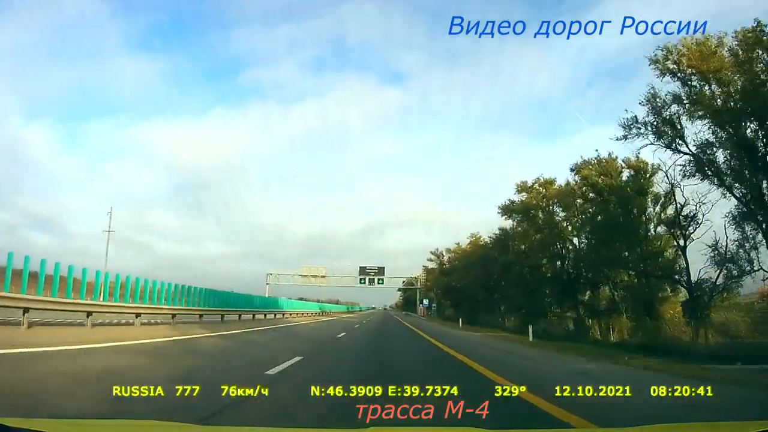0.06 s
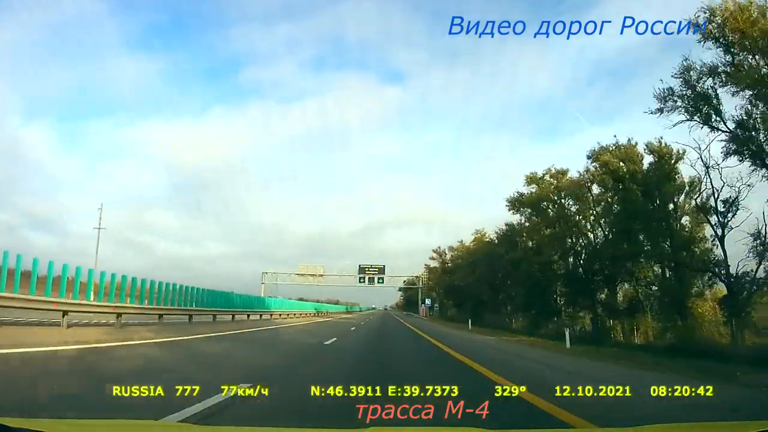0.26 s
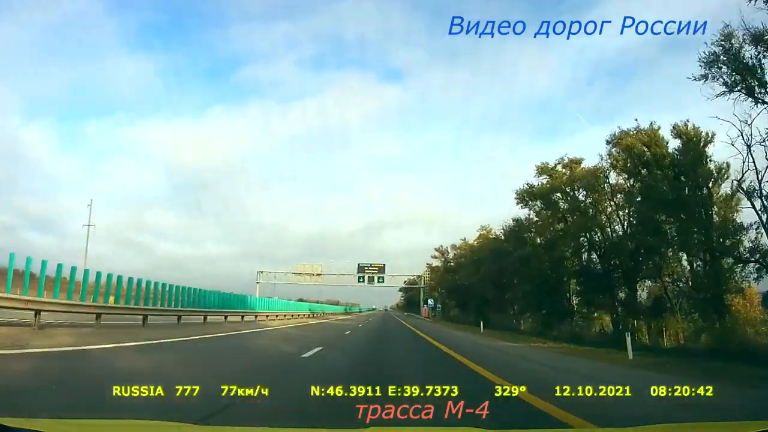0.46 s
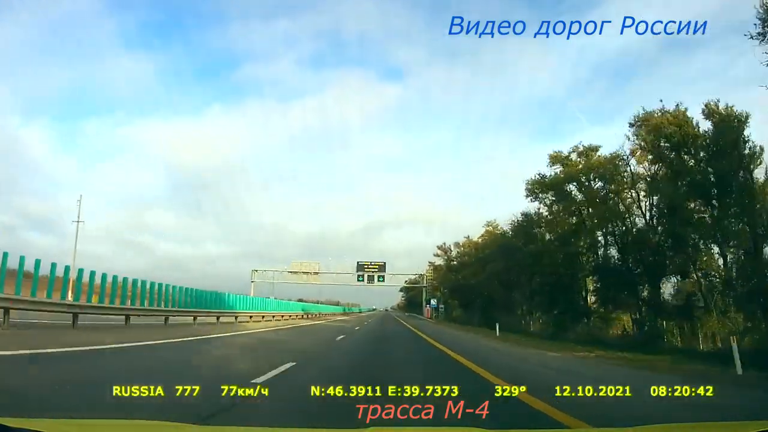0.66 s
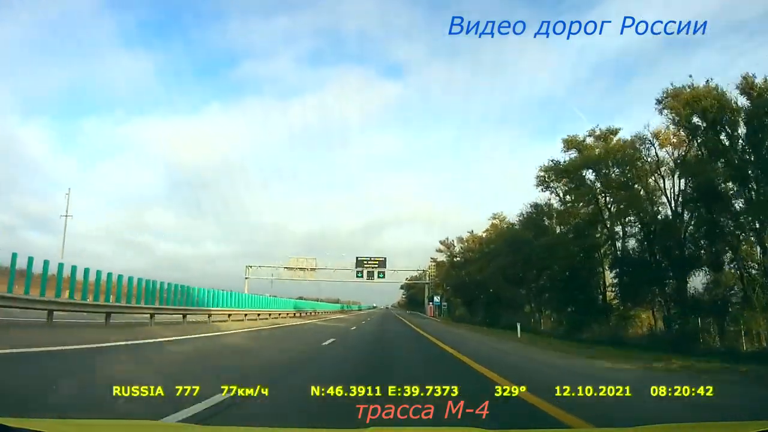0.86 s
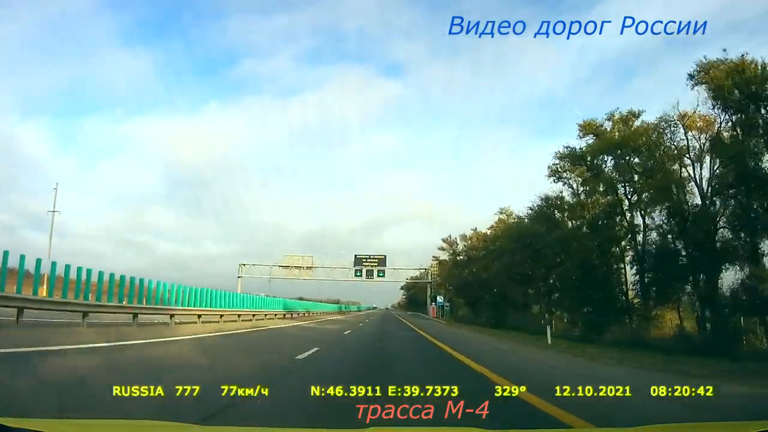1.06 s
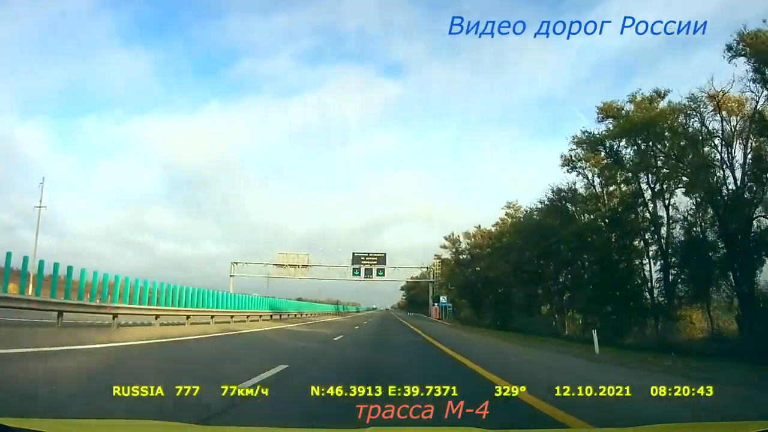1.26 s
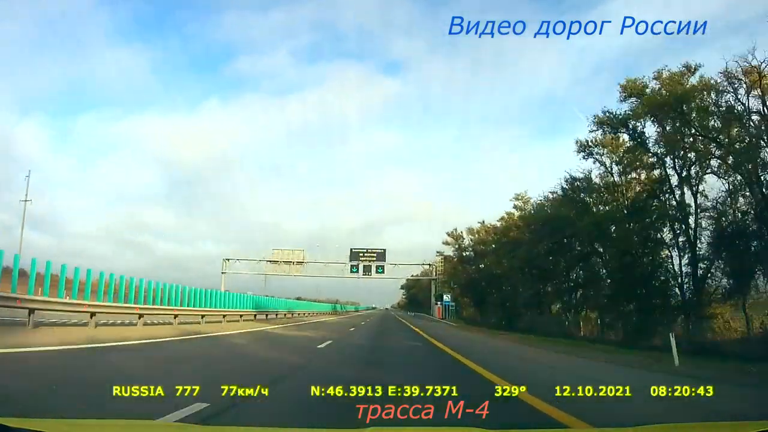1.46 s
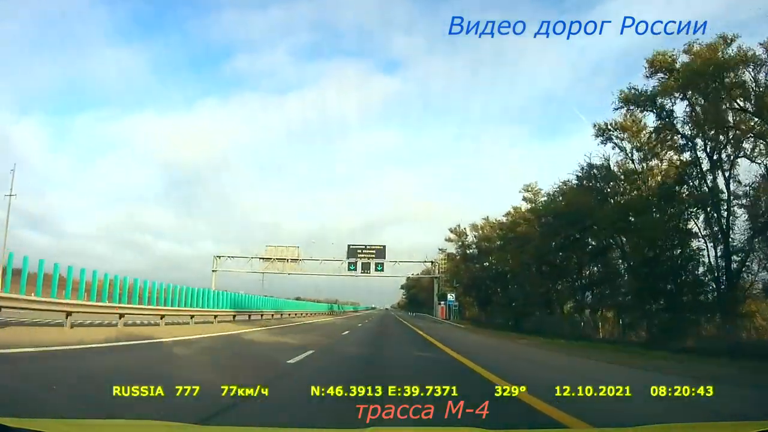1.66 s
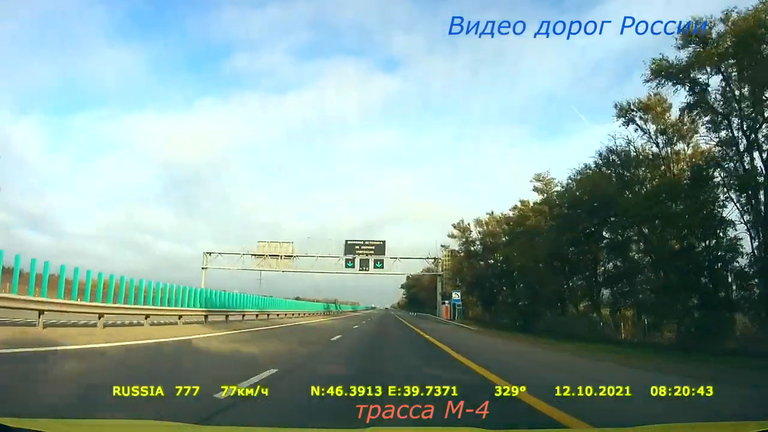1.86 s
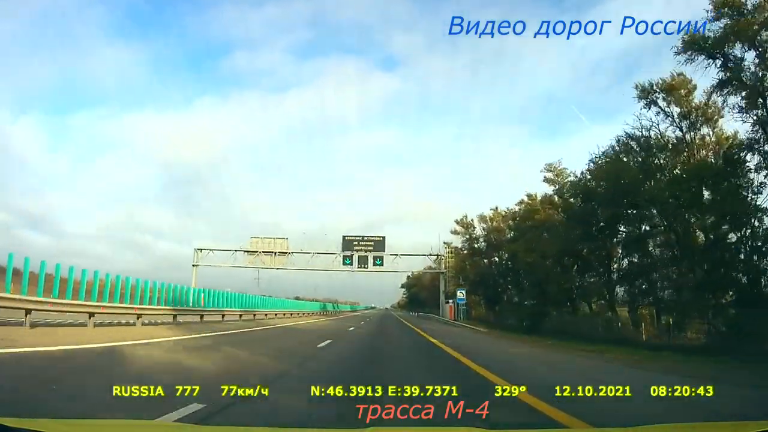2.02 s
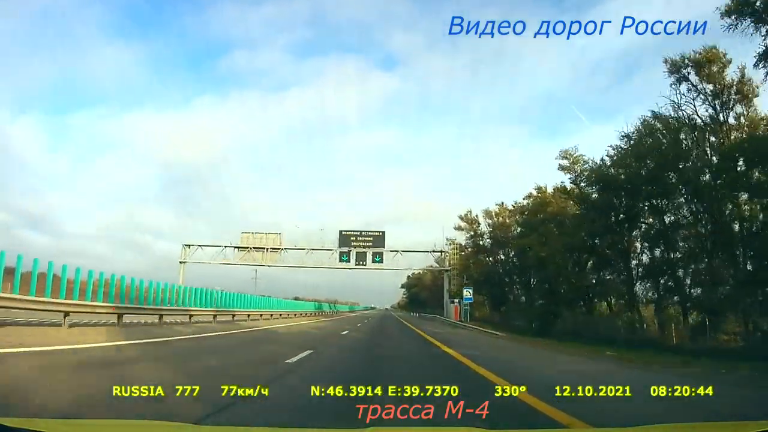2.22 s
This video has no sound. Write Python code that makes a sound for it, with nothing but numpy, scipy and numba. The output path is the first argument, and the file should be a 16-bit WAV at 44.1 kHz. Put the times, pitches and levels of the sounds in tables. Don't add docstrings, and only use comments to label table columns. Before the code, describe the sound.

Car interior at motorway speed: even tyre drone, deep cabin rumble, faint seam bumps, electronic buzzes

```python
import sys
import numpy as np
from scipy import signal
from scipy.fft import rfft, irfft
from scipy.io import wavfile
from scipy.ndimage import uniform_filter1d
from numba import njit

SR = 44100
rng = np.random.default_rng(int(sys.argv[2]) if len(sys.argv) > 2 else 0)


def boost_factor(decibels):
    exponent = np.asarray(decibels, float) / 20
    return 10 ** exponent


def transcribe(u):
    v = np.clip(np.atleast_2d(u).T, -1, 1)
    q = np.round(v * 32767).astype(np.int16)
    wavfile.write(sys.argv[1], SR, q)


N = 100900

# f/Hz, width/Hz, level/dB
TREAD_RINGS = [(766, 61, -47.5), (852, 53, -37), (929, 90, -42.5), (975.5, 43.5, -37), (1037, 42, -38.5),
               (1077.2, 39, -36), (1151, 67, -39), (1243, 68, -44), (1318, 52, -39), (1432, 110, -38.5),
               (1559, 147, -41), (1708, 150, -47), (1930, 95, -49), (2127, 120, -48.5)]
# f/Hz, width/Hz, level/dB
CABIN_RINGS = [(24.4, 15, -35.5), (42, 26.5, -40), (87.7, 33.4, -44), (111.8, 25, -46), (137.3, 14, -47.5),
               (165, 22, -50.5), (212.8, 23, -44), (241, 49, -48), (339.7, 59, -44.5), (465, 62, -44.5),
               (557.4, 90, -44), (626, 48, -49.5)]
# t/s, level/dB
ROAD_LOAD = [(0.0, -29), (0.02, -30.5), (1.01, -30.5), (1.04, -29.5), (1.14, -32), (1.15, -28.5),
             (1.26, -30.5), (2.0, -30), (2.06, -32), (2.08, -32), (2.09, -29.5), (2.29, -32)]
# t/s, blow over the grain/dB
SEAMS = [
    (0.525, 25),
    (0.735, 23.5),
    (1.174, 24),
    (1.812, 26),
    (1.882, 28),
    (2.082, 27),
]
# t/s, level/dB
BODY_HEAVE = [(0.0, -28), (0.09, -52), (0.6, -32.5), (0.62, -47), (0.79, -37), (0.85, -49), (0.93, -37),
              (1.11, -26), (1.13, -48), (1.37, -28), (1.41, -46), (1.57, -30), (2.1, -38.5), (2.12, -40),
              (2.27, -23), (2.29, -36)]
# f/Hz, level per Hz/dB
HISS_COLOUR = [(1470, -54), (2500, -1.5), (3100, -5), (3630, -3.5), (4600, -7.5), (9580, -10),
               (15500, -10.5)]
# t/s, peak level/dB, length/s
WRITES = [(0.097, -38, 0.024), (0.388, -37.5, 0.022), (0.508, -38, 0.024), (0.699, -37, 0.022),
          (0.905, -38.5, 0.027), (1.148, -39.5, 0.021), (1.3803, -38, 0.023), (1.554, -39, 0.024),
          (1.707, -37.5, 0.024), (1.938, -40, 0.024), (2.102, -38, 0.03)]
# t/s, peak level/dB, length/s
CHECKS = [
    (0.13, -50, 0.019),
    (0.201, -46, .006),
    (.532, -50, .02),
    (0.643, -50, .014),
    (0.928, -49, 0.024),
    (1.137, -52, 0.015),
    (1.728, -51, 0.032),
    (2.138, -64, .022),
]


def road(rings, load_db, blows, heave_db):
    grain_spread_db, flicker_db, pitch_drift = 1.5, 0.08, 0.0056
    heave_top_hz = 120
    total = 0
    for hz, width_hz, db in rings:
        grain = rng.standard_normal(N) * boost_factor(grain_spread_db * rng.standard_normal(N))
        moving_hz = hz * (1 + pitch_drift * walk(3.9))
        ringing = level(ring(grain + blows, moving_hz, width_hz), db)
        heave_share = max(1 - hz / heave_top_hz, 0)
        total = total + ringing * boost_factor(flicker_db * walk(11.9) + heave_db * heave_share)
    return total * boost_factor(load_db)


def seam_blows(t):
    push_s = 0.0004
    blows = 0
    for start, db in SEAMS:
        push = np.exp(-((t - start) / push_s) ** 2 * 4)
        blows = blows + boost_factor(db) * push / (push_s * SR / 2)
    return blows


def grit():
    hits_per_s, softest_db, spread_db = 110, -39.5, 2
    hit = rng.random(N) < hits_per_s / SR
    size = boost_factor(softest_db + spread_db * np.minimum(rng.exponential(size=N), 3))
    push = hit * size * np.sign(rng.standard_normal(N))
    return ring(push, 5400, 16000) * 4


def hiss():
    hz, db = np.array(HISS_COLOUR).T
    f = np.maximum(np.fft.rfftfreq(N, 1 / SR), 1)
    colour = boost_factor(np.interp(np.log(f), np.log(hz), db))
    noise = irfft(rfft(rng.standard_normal(N)) * colour, N)
    return level(noise, -41.5) * boost_factor(0.62 * walk(40))


def electronics(t):
    whine = np.sin(2 * np.pi * 7882 * t + 0.5 * walk(9)) * boost_factor(-1 * walk(15))
    writes = bursts(t, WRITES, hz=9490, tone_db=-6, fizz_hz=9900, fizz_db=-7.5)
    checks = bursts(t, CHECKS, hz=8603, tone_db=-2, fizz_hz=8300, fizz_db=-1)
    return level(whine, -66) + writes + checks


def bursts(t, rows, hz, tone_db, fizz_hz, fizz_db):
    edge_s, fizz_smear_s = 0.002, 0.008
    gate = 0
    for start, db, length in rows:
        inside_s = np.minimum(t - start, start + length - t)
        gate = gate + boost_factor(db) * np.clip(inside_s / edge_s + 0.5, 0, 1)
    tone = np.sin(2 * np.pi * hz * t + 0.3 * walk(160)) * boost_factor(tone_db + 1.5 * walk(300))
    fizz = level(ring(rng.standard_normal(N), fizz_hz, 4800), fizz_db) * boost_factor(1.2 * walk(120))
    soft_gate = uniform_filter1d(gate, int(fizz_smear_s * SR) + 1)
    return gate * tone + soft_gate * fizz


def level(x, db):
    return x * boost_factor(db) / np.sqrt(np.mean(x ** 2))


@njit
def svf(x, hz, width):
    y, band, low = np.empty(len(x)), 0., 0.
    for i in range(len(x)):
        g, k = np.tan(np.pi * hz[i] / SR), width / hz[i]
        v = (band + g * (x[i] - low)) / (1 + g * (g + k))
        low += 2 * g * v
        band = 2 * v - band
        y[i] = k * v
    return y


def ring(x, hz, width_hz):
    hz = hz * np.ones(len(x))
    once = svf(x, hz, 1.6 * width_hz)
    return svf(once, hz, 1.6 * width_hz)


def walk(rate):
    hold = int(SR / rate)
    steps = np.repeat(rng.standard_normal(N // hold + 1), hold)
    smooth = uniform_filter1d(uniform_filter1d(steps, hold), hold)
    return 1.54 * smooth[:N]


def curve(t, rows):
    times, db = np.array(rows).T
    return np.interp(t, times, db - db.mean())


def scene():
    t = np.arange(N) / SR
    flutter_db = 0.1 * walk(60)
    load_db = curve(t, ROAD_LOAD) + flutter_db
    blows = seam_blows(t)
    skirt = (2300, 300, -50.5)
    tread = road(TREAD_RINGS + [skirt], load_db, blows, 0)
    cabin = road(CABIN_RINGS, 0.3 * load_db, blows, 0.52 * curve(t, BODY_HEAVE))
    wind = hiss() * boost_factor(0.55 * flutter_db)
    return (tread + cabin + grit() + wind + electronics(t))[None]


def band_limit(x):
    return signal.sosfilt(signal.butter(12, 15720, fs=SR, output="sos"), x)


def record(dry):
    offset = 0.1167
    return band_limit(dry + offset)


dry = scene()
out = record(dry)
transcribe(out)
```